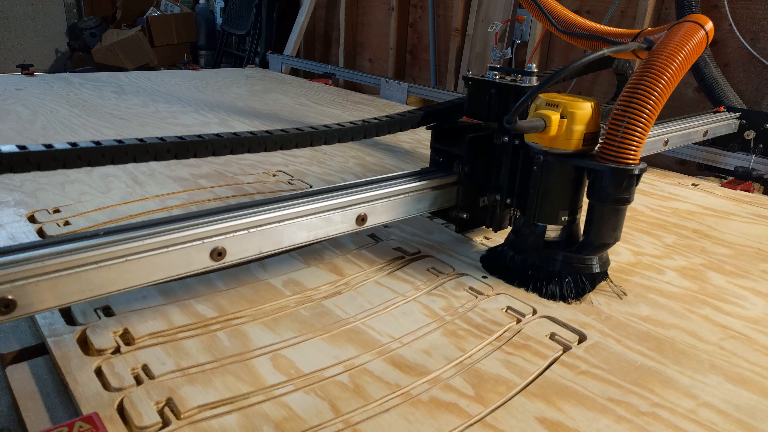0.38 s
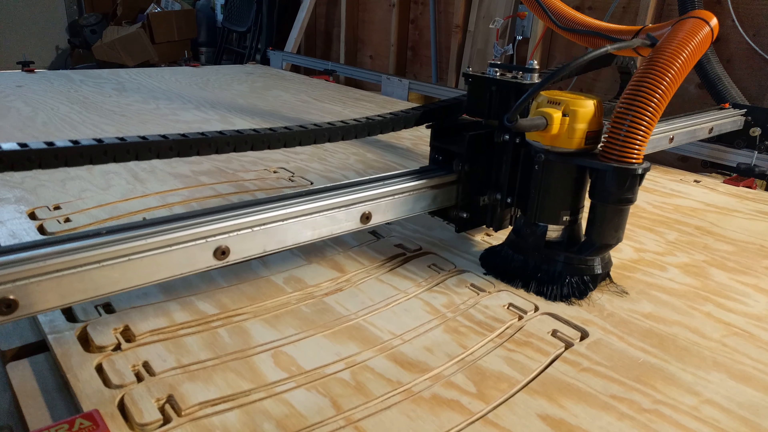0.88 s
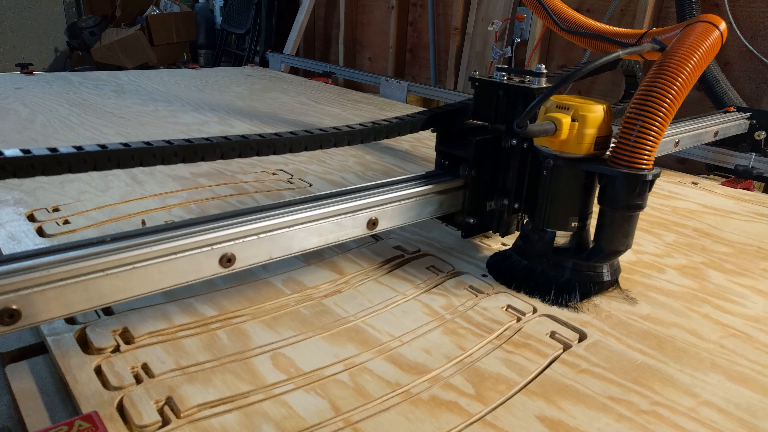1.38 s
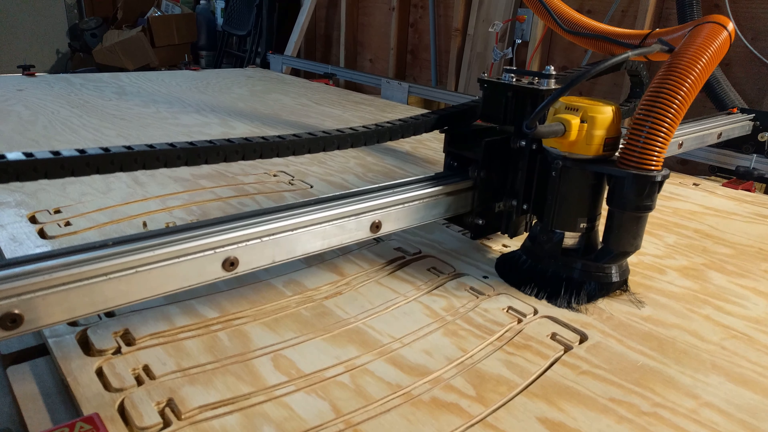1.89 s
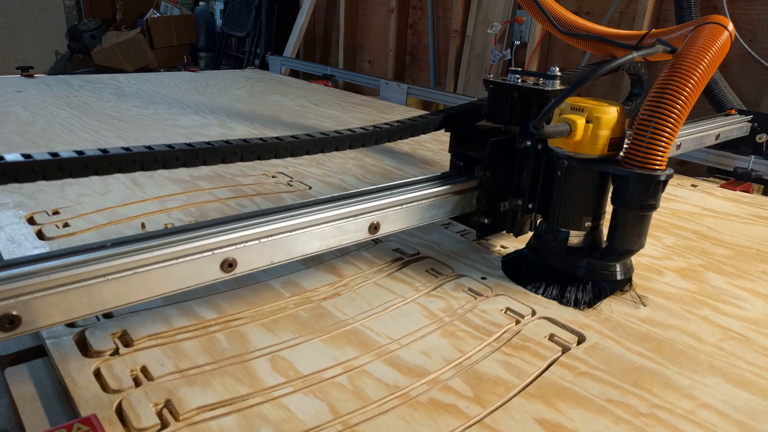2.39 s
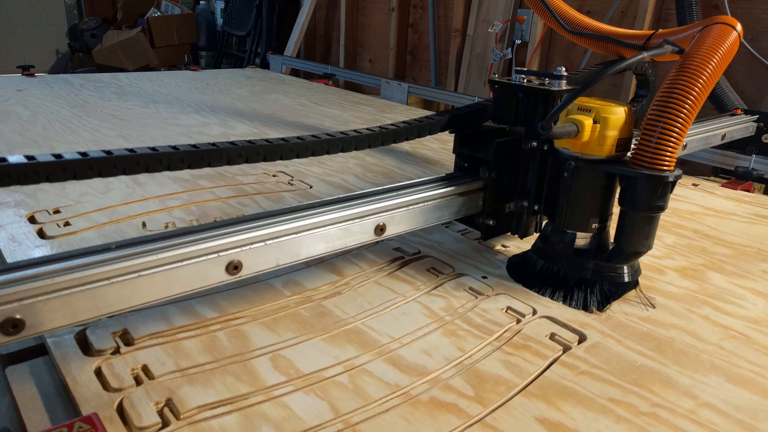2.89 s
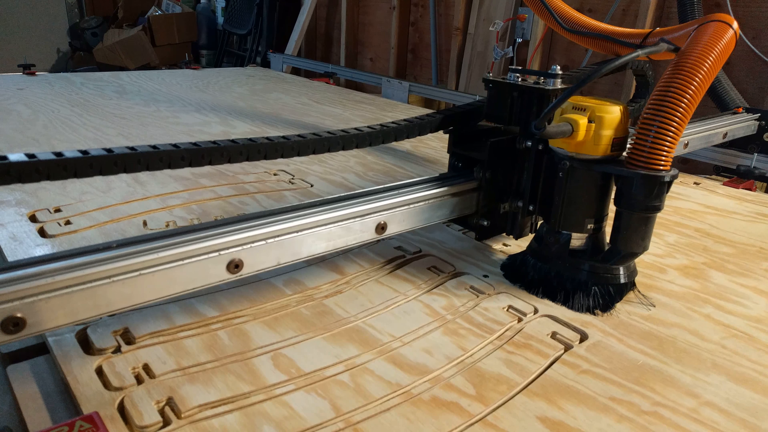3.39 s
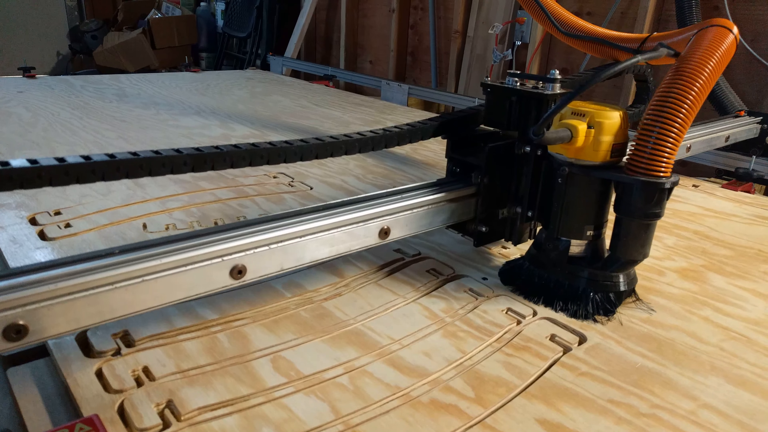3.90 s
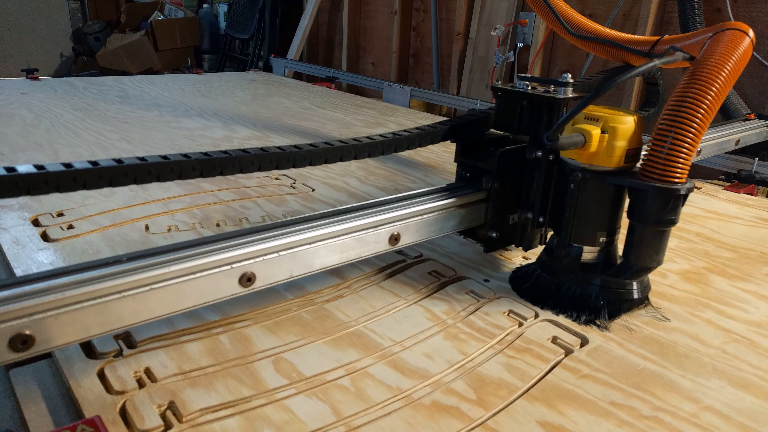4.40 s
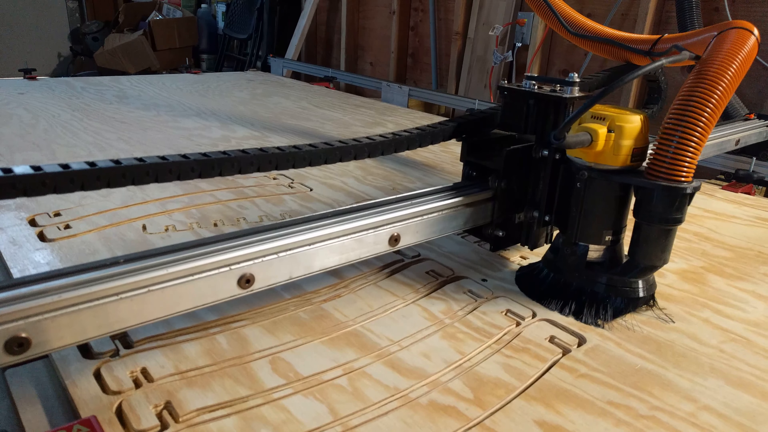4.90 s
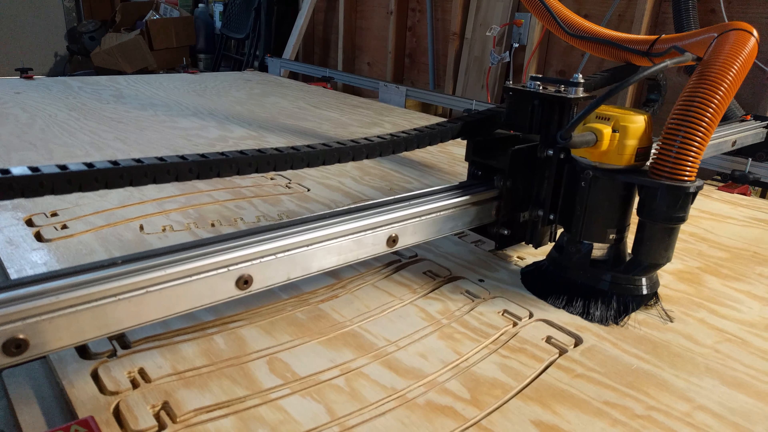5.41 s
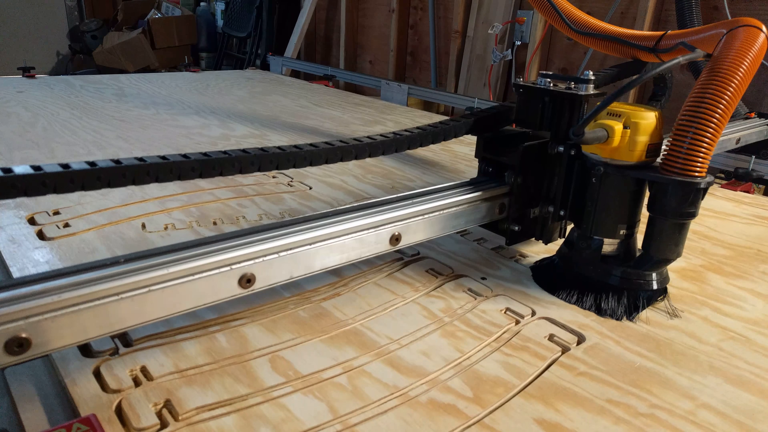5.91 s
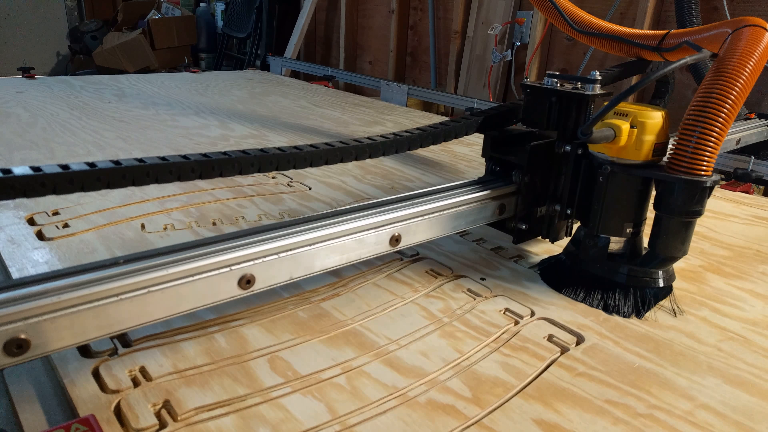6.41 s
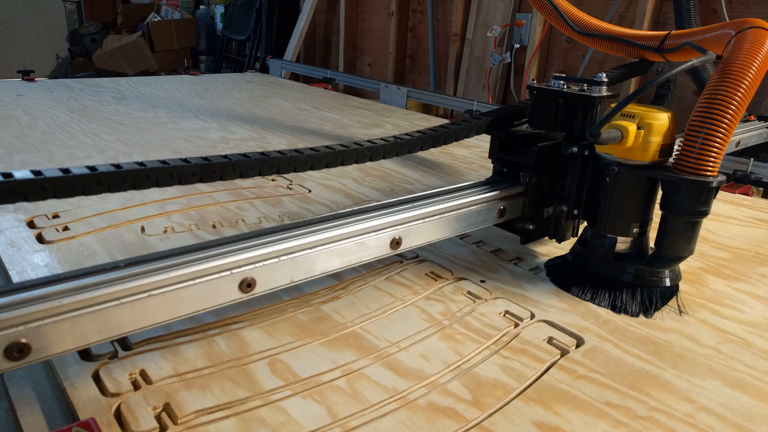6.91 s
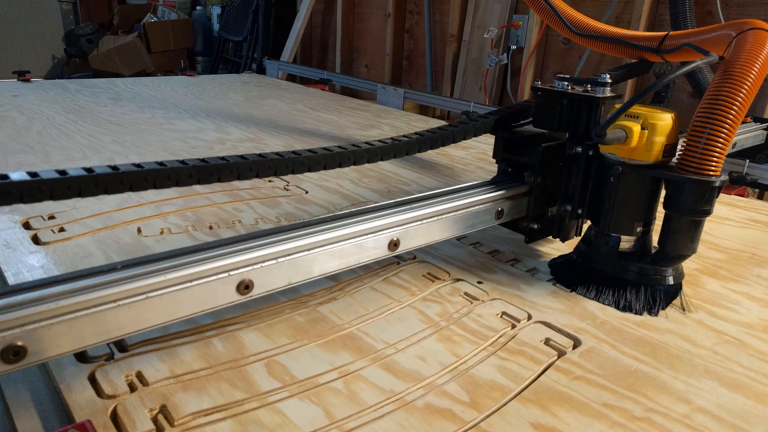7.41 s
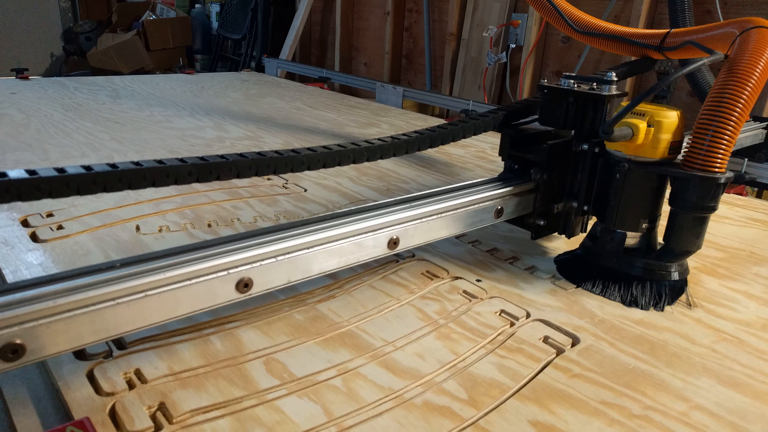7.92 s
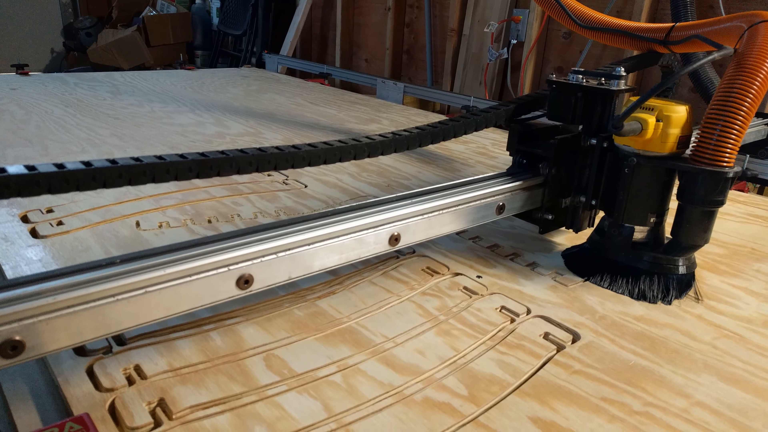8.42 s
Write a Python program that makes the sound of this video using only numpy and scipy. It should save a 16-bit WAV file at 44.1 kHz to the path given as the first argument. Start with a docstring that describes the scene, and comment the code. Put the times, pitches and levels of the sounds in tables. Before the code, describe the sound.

In a workshop, close to one microphone, a router spindle runs without a break, its dense buzzing whine around 300 hertz and many overtones up to a piercing 3 kilohertz. The bit grinds through plywood with gritty, hissing chips. Pitch sags and jumps slightly at corners, short grabs bite harder, and rapid chatter flickers later on. Vacuum air rushes underneath with a faint low hum.

```python
"""In a workshop, before one microphone, a small router spindle turns about 304 times a second and cuts plywood.
Sines at shaft orders whine and shift their balance as the path turns; bearing tones sit at fifths of an order.
Noise in the resonances of the sheet and dust shoe makes the chips, with hiss above; the bit's chatter is
an unsteady sine chopped by the shaft.
A vacuum rushes as coloured noise and sings in steady tones; low sines make a wavering hum."""
import sys
import numpy as np
from scipy import signal
from scipy.fft import rfft, irfft, next_fast_len
from scipy.io import wavfile
from scipy.ndimage import uniform_filter1d

SR = 44100
rng = np.random.default_rng(int(sys.argv[2]) if len(sys.argv) > 2 else 0)


def boost_factor(decibels):
    """Convert a level in decibels to a linear amplitude factor."""
    exponent = np.asarray(decibels, float) / 20
    return 10 ** exponent


def transcribe(u):
    """Save the signal u as a 16-bit wav file named by the first command-line argument.

    u: samples, shape (n,) or (channels, n), limited to [-1, 1]; the rate is SR.
    q: integer samples, one column per channel.
    """
    v = np.clip(np.atleast_2d(u).T, -1, 1)
    q = np.round(v * 32767).astype(np.int16)
    wavfile.write(sys.argv[1], SR, q)


N = 376613  # samples


def unit(x):
    """Scaled to rms 1."""
    return x / np.sqrt(np.mean(x ** 2) + 1e-20)


def curves(rows):
    """One value per sample for each column after the time."""
    seconds, *columns = np.transpose(rows)
    return [np.interp(np.arange(N) / SR, seconds, column) for column in columns]


def wobble(rate):
    """A random curve through normal draws, rate knots a second."""
    knots = rng.standard_normal(1200)
    return np.interp(np.arange(N) * rate / SR, np.arange(len(knots)), knots)


def bursts(rows, rest_db, edge_s):
    """A level in dB that rises from its rest for each row of start, length, dB; lower rows change nothing."""
    start, length, db = np.transpose(rows)[:3, :, None]
    t = np.arange(N) / SR
    inside_s = np.minimum(t - start, start + length - t)
    on = np.clip(inside_s / edge_s + .5, 0, 1)
    return rest_db + np.max(on * np.maximum(db - rest_db, 0), axis=0)


def noise(response, patchy_db, size=(5, 16)):
    """Noise of rms 1 with a colour and patches of random gain, size bins high and frames long."""
    spectrum = signal.stft(rng.standard_normal(N + 512), nperseg=512)[2]
    field = uniform_filter1d(rng.standard_normal(spectrum.shape), size=size[0], axis=0)
    field = uniform_filter1d(field, size=size[1], axis=1)
    patchy = signal.istft(spectrum * boost_factor(patchy_db * unit(field)), nperseg=512)[1]
    m = next_fast_len(N + SR // 4)
    coloured = irfft(rfft(patchy, m) * response(np.fft.rfftfreq(m, 1 / SR)), m)
    return unit(coloured[:N])


def shaped(points):
    """Gain through (Hz, dB) points on a log frequency axis."""
    f, db = np.transpose(points)
    return lambda hz: boost_factor(np.interp(np.log(hz + 1), np.log(f + 1), db))


def ringing(modes):
    """Response of a few steep resonances, added in power and dark between them."""
    def response(f):
        power = 0
        for centre, width, db in modes:
            resonance = np.abs(f * width / (centre * centre - f * f + 1j * f * width))
            power = power + boost_factor(2 * db) * resonance ** 4
        return np.sqrt(power)
    return response


def tone(angle, db, flutter_db, blur):
    """A sine at rms db whose level flutters and whose phase trembles by blur radians."""
    phase = angle + 2 * np.pi * rng.random() + blur * wobble(45)
    return np.sqrt(2) * boost_factor(db + flutter_db * wobble(25)) * np.sin(phase)


# The spindle sags under load and races at corners. Each row: time in seconds, shaft turns in Hz.
SHAFT_SPEED = [(0.0, 311.7), (0.06, 310.0), (0.14, 306.0), (0.3, 302.8), (0.4, 304.8), (0.68, 305.1),
               (0.86, 301.6), (1.1, 302.6), (1.34, 301.0), (1.52, 302.1), (1.64, 306.0), (1.7, 309.0),
               (1.76, 306.8), (2.26, 303.3), (2.48, 304.4), (2.56, 305.8), (2.7, 301.8), (2.9, 303.8),
               (3.0, 309.4), (3.06, 308.4), (3.18, 304.6), (3.32, 303.8), (3.5, 305.7), (3.66, 305.6),
               (3.84, 301.9), (4.56, 303.3), (4.62, 306.4), (4.68, 308.0), (4.74, 305.1), (5.26, 303.5),
               (5.4, 304.6), (5.6, 303.6), (6.2, 304.9), (6.26, 305.6), (6.36, 303.3), (6.58, 304.6),
               (6.92, 303.2), (7.58, 305.2), (7.68, 304.7), (8.54, 304.0)]


def spindle():
    """Shaft angle in radians, summed from its changing speed."""
    return 2 * np.pi * np.cumsum(curves(SHAFT_SPEED)[0]) / SR


# How hard the bit bites, heard near 2.9 kHz. Each row: time in seconds, level in dB before grabs,
# on-off flutter in dB.
BITE_LEVEL = [(0, -28, 1), (.16, -28, 1), (.3, -27, 4), (.55, -25, 2), (.85, -31, 3), (1.02, -30.5, 1),
              (1.52, -22.5, 2), (1.7, -23, 1), (2.23, -22, 1), (2.7, -24, 1), (3.1, -27, 3), (3.75, -21, 0),
              (3.88, -27, 1.5), (4.16, -24.5, 5), (4.55, -24, 2.5), (4.75, -19, 1.5), (5.23, -18, 2),
              (5.8, -19, 2), (6.37, -20.5, -1.5), (6.68, -20, 3.5), (6.97, -17, 4), (7.59, -17.5, 1),
              (8.1, -19, 4.5), (8.54, -20.5, 1)]
# The bit grabs the wood for a moment. Each row: start in seconds, length in seconds, level in dB.
WOOD_GRABS = [(.04, .05, -17.5), (.13, 0.15, -19), (.563, .06, -15), (.69, 0.096, -18), (1.75, .044, -19),
              (1.81, .052, -18), (1.894, .06, -18), (2.007, .125, -18), (2.19, .07, -18),
              (2.315, 0.11, -17), (2.45, 0.11, -19), (2.616, .054, -19), (2.85, 0.089, -16),
              (3.162, 0.064, -16), (3.259, .04, -15), (3.326, 0.072, -17), (3.415, .18, -16),
              (3.62, .13, -15.5), (3.76, 0.087, -19)]


def biting():
    """Level of the bite in dB: it rises at grabs and flips a little between strong and weak."""
    db, flutter_db = curves(BITE_LEVEL)
    flips = np.tanh(2 * wobble(22))
    return bursts(WOOD_GRABS, db, edge_s=.012) + flutter_db * flips


# The balance of the orders shifts from leg to leg of the path. Each row: time in seconds,
# lightness of the cut, three further blends of the orders, all roughly -1 to 1.
ORDER_BLEND = [(0.0, -0.22, -0.5, -0.1, -0.18), (0.13, -0.24, -0.25, -0.13, 0.48),
               (0.3, -0.14, -0.6, 0.15, -0.087), (0.78, -0.3, 0.0, -0.48, 0.3),
               (0.88, -0.73, -0.084, 0.69, -0.4), (1.25, -0.63, 0.084, 0.89, -0.24),
               (1.55, -0.6, -0.32, 0.4, 0.0), (1.62, -0.29, -1.0, -0.78, 0.033),
               (1.72, -0.27, -0.4, -0.69, -0.5), (1.8, 0.44, -1.0, -0.0, -0.04),
               (2.33, 0.35, -0.73, -0.18, -0.43), (2.5, -0.27, -0.1, -0.6, 0.1),
               (2.7, -0.6, 0.019, -0.33, -0.026), (2.9, -0.42, -0.4, -0.6, -0.2),
               (3.1, -0.31, -0.27, 0.26, -0.13), (3.25, -0.5, -0.014, -1.1, 0.6),
               (3.74, -0.26, 0.039, -0.7, 0.45), (3.84, -0.76, 0.77, -0.0, 0.34),
               (4.15, -0.54, 0.053, 0.11, 0.2), (4.52, -0.93, 0.23, 0.6, -0.74),
               (4.6, -0.42, -0.96, -0.99, 0.043), (4.7, -0.12, 0.016, -0.8, -0.86),
               (4.78, 0.12, -0.16, 0.4, -0.16), (5.35, 0.2, -0.53, 0.6, -0.17),
               (5.85, 0.52, -0.24, 0.95, 0.0071), (6.35, 0.43, 0.15, 0.31, 0.27),
               (6.9, 0.34, 0.49, 0.39, -0.26), (7.45, 0.3, 0.46, 0.38, -0.093),
               (7.65, 0.67, 0.3, -0.16, -0.092), (8.54, 0.46, 0.5, -0.9, -0.54)]
# The 3rd order, core of the whine. Each row: time in seconds, level in dB before the lift at grabs.
THIRD_ORDER = [(0.0, -31), (0.09, -32), (0.14, -21), (0.5, -23.5), (0.59, -21), (0.64, -24.5),
               (0.76, -20.5), (0.93, -27), (1.09, -23), (1.71, -23), (1.76, -20), (2.09, -20), (2.16, -22),
               (2.78, -25), (2.92, -22.5), (3.02, -38), (3.07, -26), (3.21, -22), (3.81, -21.5),
               (3.85, -25.5), (4.54, -24), (4.61, -34), (4.66, -25), (4.73, -19.5), (5.21, -21),
               (5.25, -23), (5.4, -19), (5.56, -22), (6.33, -20), (6.37, -23), (6.97, -23.5), (7.02, -21.5),
               (8.49, -28), (8.54, -27)]
# Shaft orders and two strong bearing tones. Each row: order, middle level in dB,
# swing in dB with lightness and with each of the three further blends.
MAIN_TONES = [(1.0, -34.0, 4.0, -0.0, 0.5, -2.5), (2.0, -32.5, -8.5, -5, 0.5, 2.0),
              (3.6, -34.5, 2.5, 1.0, -1.5, -5), (4.0, -32.5, 9.0, -2.0, 0.5, 2.5),
              (5.0, -31.5, -4, 10, -2.0, -1), (6.0, -28.0, 6.5, -1, -1.0, 6.5),
              (7.0, -34, 6.5, -6.5, -6.5, 1.5), (7.6, -36, -1.5, -3.5, 5.5, 1.5),
              (8.0, -33.5, -9, 4, -3, 1.5), (11.0, -40.5, 12, 9, 10, -1), (12.0, -30.0, 1.0, 1, 0, -6),
              (13.0, -34, 2.5, -2, 0.5, -5), (14.0, -30.5, 12, 4, 2.5, 13), (15.0, -27, 3, 1, -4, 1.5),
              (16.0, -43, 7, 1.0, -14, 10), (17.0, -32, 3.5, -1.5, 4, 2)]
# Cluster near 2.9 kHz. Each row: order, level in dB relative to the bite, the same four swings in dB.
BITE_TONES = [(9.0, -6.5, -7, -0.0, 1.0, -4.5), (9.6, -5.5, -1, 1.0, -0.0, -0.5),
              (10.0, -9.5, -0.5, -0.0, 1.0, 2)]
# Weaker shaft orders, free to wander. Each row: order, middle level in dB.
WEAK_ORDERS = [(18.0, -63), (19.0, -42), (20.0, -35.5), (21.0, -40), (22.0, -41), (23.0, -40.5),
               (24.0, -39), (25.0, -44)]
# Bearing tones between the orders. Each row: order, level in dB at the mean bite.
BEARING_TONES = [(4.6, -43.5), (5.2, -41.5), (5.6, -47), (6.6, -37.5), (7.4, -50), (8.2, -58), (8.4, -42),
                 (8.6, -41), (9.4, -37), (10.2, -34.5), (10.6, -36), (11.2, -52), (11.6, -39), (12.4, -45),
                 (12.6, -50), (13.6, -53), (15.6, -38), (17.6, -49), (14.4, -61), (17.2, -55)]
# Single orders flare up for a moment, most clearly at corners. Each row: start in seconds,
# length in seconds, level in dB, order.
ORDER_FLARES = [(.28, .06, -24, 14), (.73, .09, -25, 8), (1.44, .12, -27, 14), (1.58, .05, -24, 7),
                (1.72, .05, -23, 7), (2.5, .25, -26, 6), (2.62, .17, -23, 14), (3.15, .65, -26, 6),
                (3.77, .25, -22, 8), (4.13, .25, -23, 12), (4.19, .19, -22, 15), (4.575, .045, -23, 7),
                (4.62, .1, -20, 9), (4.7, .05, -23, 7), (5.29, .21, -24, 15), (5.6, .75, -24, 6),
                (6.6, .15, -22, 6), (7.5, .14, -20, 6), (7.78, .16, -23, 14)]


def whine(shaft, bite_db):
    """Shaft orders and bearing tones; the higher the order, the more the cut shakes it."""
    load_db = bite_db - bite_db.mean()
    grab_db = bite_db - curves(BITE_LEVEL)[0]
    blends = np.array(curves(ORDER_BLEND))
    played = [(3, curves(THIRD_ORDER)[0] + 0.23 * grab_db)]
    for order, db, *swings in MAIN_TONES:
        played.append((order, db + np.dot(swings, blends) + 1.5 * wobble(8)))
    for order, db, *swings in BITE_TONES:
        played.append((order, bite_db + db + np.dot(swings, blends) + 0.88 * wobble(8)))
    for order, db in WEAK_ORDERS:
        played.append((order, db + 1.5 * wobble(4)))
    for order, db in BEARING_TONES:  # bearing load follows the cut, 0.7 dB per dB
        played.append((order, db + 0.7 * load_db + 2.1 * wobble(4)))

    grain = wobble(16)  # uneven plies shake all orders together
    total = np.zeros(N)
    for order, db in played:
        flares = [row for row in ORDER_FLARES if row[-1] == order]
        if flares:
            db = bursts(flares, db, edge_s=.025)
        flutter_db = min(0.24 * order, 2.4)
        total += tone(order * shaft, db + 0.07 * order * grain, flutter_db, blur=0.029 * order)
    return total


# Chip level by band; the noise itself lies under the first two. Each row: time in seconds,
# level near 3.5 kHz in dB, level near 5 kHz in dB, hiss in dB.
CHIP_LEVELS = [(0.0, -24, -30, -20), (0.14, -28, -23, -16.5), (0.28, -22, -16, -18.5),
               (0.57, -25, -24, -18), (1.02, -28, -36, -19.5), (1.74, -19.5, -25, -17.5),
               (2.33, -24, -19.5, -17.5), (2.5, -16, -23, -18.5), (2.76, -22, -18, -19),
               (2.8, -23, -25, -20), (2.88, -16, -11, -17.5), (3.0, -30, -21, -20), (3.12, -22, -15, -18),
               (3.4, -21, -16.5, -17), (3.66, -20, -19, -16.5), (3.81, -22, -25, -18),
               (4.09, -23, -15, -20.5), (4.21, -19, -16.5, -17.5), (4.61, -21, -13.5, -19),
               (4.78, -21, -16, -17.5), (6.73, -19.5, -13, -17.5), (7.42, -17.5, -16.5, -17),
               (7.73, -21.5, -11.5, -19), (8.25, -22, -17, -19), (8.47, -23, -16.5, -19),
               (8.54, -20, -21, -18)]
# Where the chip noise rings, in three bands. Each row: centre in Hz, width in Hz, relative gain in dB.
BITE_RESONANCES = [(2140, 120, -0.5), (2734, 190, 9), (2950, 120, 4), (3090, 75, -10)]
LOW_RESONANCES = [(3410, 120, -5), (3610, 300, -4.5), (3980, 200, -9.5)]
HIGH_RESONANCES = [(4520, 260, 2.5), (4880, 200, -6), (5170, 410, -2), (5520, 210, -5), (5800, 120, -3)]
# Hiss of chips and cooling fan. Each row: frequency in Hz, relative density in dB per Hz.
HISS_COLOUR = [(2000, -33), (5000, 1), (6500, -2), (8000, 1), (8800, -1.5), (10100, 2.5), (11500, 0.5),
               (12600, 4), (13200, -3.5), (14300, 1.5), (15500, -4), (16400, 7.5), (17000, -13)]
# Shaft and bearing make the chip noise throb. Each row: order, depth as a fraction of 1.
CHIP_THROB = [(.2, .04), (.4, .045), (.6, .1), (1, .12), (1.4, .03), (2, .035)]


def chips(shaft, bite_db):
    """Fibres tear: noise in the resonances of sheet and shoe, with hiss above."""
    low_db, high_db, hiss_db = curves(CHIP_LEVELS)
    throb = 1 + sum(depth * np.sin(order * shaft + 2 * np.pi * rng.random()) for order, depth in CHIP_THROB)
    burst = wobble(22)
    # the noise lies a few dB under the level of its band: tones carry the rest
    bite_db = bite_db - 9 + 0.26 * burst
    low_db = low_db - 3.5 + 0.57 * burst + 0.77 * wobble(12)
    high_db = high_db - 5 + 0.65 * burst + 0.83 * wobble(12)
    hiss_db = hiss_db + .5 * burst + 0.29 * wobble(12)
    bite = boost_factor(bite_db) * noise(ringing(BITE_RESONANCES), patchy_db=-1)
    low = boost_factor(low_db) * noise(ringing(LOW_RESONANCES), patchy_db=-0.5, size=(2, 50))
    high = boost_factor(high_db) * noise(ringing(HIGH_RESONANCES), patchy_db=4.0, size=(2, 50))
    # echoes off the sheet colour the hiss in long bands that shift as the gantry travels
    hiss = boost_factor(hiss_db) * noise(shaped(HISS_COLOUR), patchy_db=1.85, size=(3, 220))
    return throb * (bite + low + high + hiss)


# Steady tones of the vacuum motor and the mains. Each row: multiple of the base, base in Hz,
# level in dB, wavering in dB.
MOTOR_TONES = [(1, 323.7, -37, .7), (2, 323.7, -40.5, 1.5), (3, 323.7, -48, 2.5), (3, 120, -47, 2.5),
               (1, 405, -49, 2.5)]
# Suction air and room roar. Each row: frequency in Hz, relative density in dB per Hz.
AIR_COLOUR = [(20, -40), (45, -17), (65, -6.5), (120, -2), (300, -4), (500, -4), (700, -1), (780, -3.5),
              (860, -5), (1000, -4), (1400, -1), (2400, 3.5), (5000, 1), (9000, -6), (18000, -11)]


def vacuum():
    """Broad rush of the suction air, with the motor's own pitch and mains tones as wavering sines."""
    turn = 2 * np.pi * np.arange(N) / SR
    tones = sum(tone(multiple * hz * turn, db + waver_db * wobble(6.7), flutter_db=-1.8, blur=0.18)
                for multiple, hz, db, waver_db in MOTOR_TONES)
    air_db = -19.0 + 0.16 * wobble(3.2)
    return tones + boost_factor(air_db) * noise(shaped(AIR_COLOUR), patchy_db=2.0, size=(2, 24))


# The low hum. Each row: frequency in Hz (played at the nearest whole Hz), level in dB, wavering in dB.
HUM_TONES = [(120.4, -41, 1), (161.7, -45, 3.5), (238.7, -45, 3)]


def low_hum():
    """Low sines whose levels waver and whose phases tremble."""
    turn = 2 * np.pi * np.arange(N) / SR
    return sum(tone(round(hz) * turn, db + waver_db * wobble(7), flutter_db=3.4, blur=0.23)
               for hz, db, waver_db in HUM_TONES)


# Bursts of chatter. Each row: start in seconds, length in seconds, level in dB before pulsing and wander,
# middle pitch in Hz.
CHATTER_BURSTS = [(0.28, 0.2706, -23, 4300), (2.772, .034, -25, 4360), (3.095, .052, -19.5, 4329.5),
                  (4.172, .048, -19, 4426), (4.39, 0.083, -19.5, 4370), (4.475, 0.1, -21, 4355),
                  (4.589, 0.1, -14.5, 4390), (4.709, 0.115, -24, 4340), (5.056, 0.075, -20, 4340),
                  (5.945, .04, -25, 4303), (6.086, .25, -22, 4320), (6.328, .1, -25, 4370),
                  (6.623, .104, -17, 4370), (6.896, .036, -22, 4434), (7.633, .118, -24, 4270),
                  (7.8, 0.2, -22, 4000), (8.18, 0.057, -22, 4340)]


def chatter(shaft):
    """An unsteady tone, cleaner when strong, chopped by the turning shaft into side tones."""
    start, length, _, burst_hz = np.transpose(CHATTER_BURSTS)
    hz = np.interp(np.arange(N) / SR, start + length / 2, burst_hz) + 12 * wobble(12)
    db = bursts(CHATTER_BURSTS, rest_db=-30.5, edge_s=0.021) + 1.6 * wobble(15)
    pulse_hz = 35 + 6 * wobble(4.5)  # quick, fairly regular pulses
    db = db + 4 * np.sin(2 * np.pi * np.cumsum(pulse_hz) / SR)
    rough = np.clip((-13 - db) / 8, .15, 1)
    chop = 1 + 0.59 * np.sin(shaft) + 0.27 * np.sin(3 * shaft)
    angle = 2 * np.pi * np.cumsum(hz) / SR + 0.68 * rough * wobble(110)
    return chop * tone(angle, db + 3.7 * rough * wobble(70), flutter_db=-2.0, blur=0.21)


def scene():
    """Spindle, cut, vacuum and hum heard by one microphone; distance is held in each source's level."""
    shaft = spindle()
    bite_db = biting()
    mix = whine(shaft, bite_db) + chips(shaft, bite_db) + vacuum() + low_hum() + chatter(shaft)
    return mix[None]


def top_cut(x):
    """Nothing passes above the cut-off."""
    return signal.sosfilt(signal.butter(12, 17870, fs=SR, output="sos"), x)


def record(dry):
    """Peaks round off near full scale and nothing is kept from the band limit up."""
    ceiling, band_limit_hz = 1.12, 16990  # ceiling relative to full scale
    rounded = dry / (1 + np.abs(dry / ceiling) ** 6) ** (1 / 6)
    m = next_fast_len(N)
    in_band = np.fft.rfftfreq(m, 1 / SR) < band_limit_hz
    kept = irfft(rfft(rounded, m) * in_band, m)[:, :N]
    return top_cut(kept)


dry = scene()
out = record(dry)
transcribe(out)
```